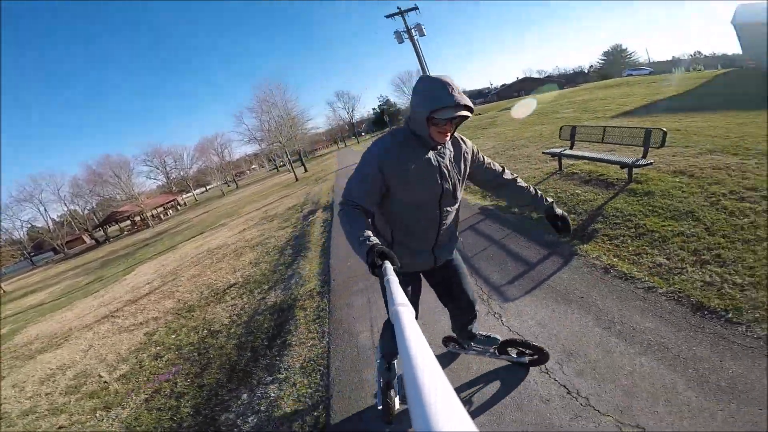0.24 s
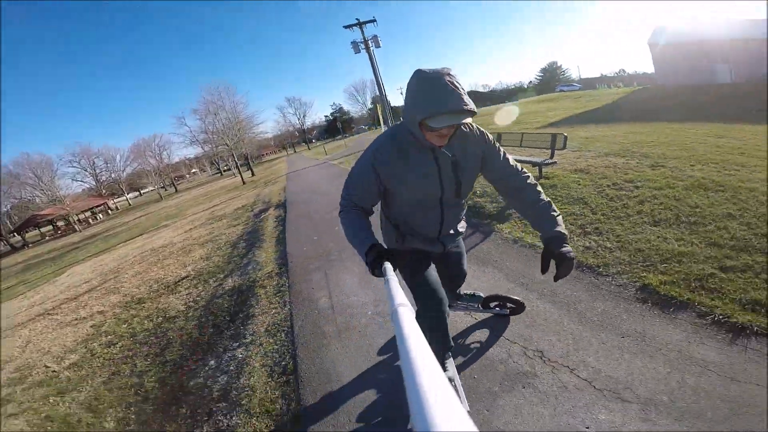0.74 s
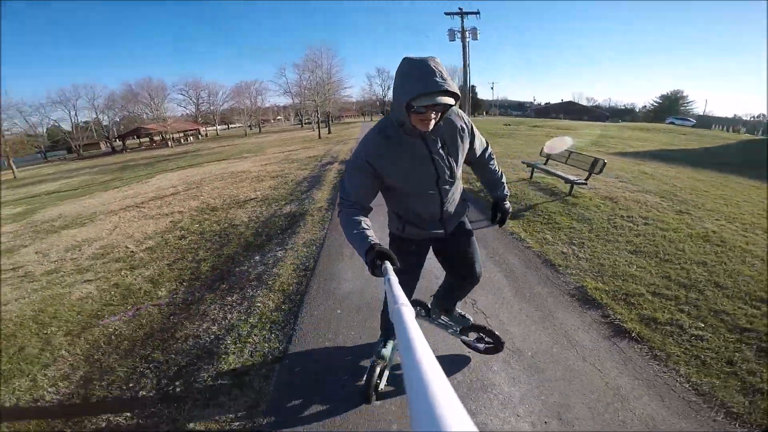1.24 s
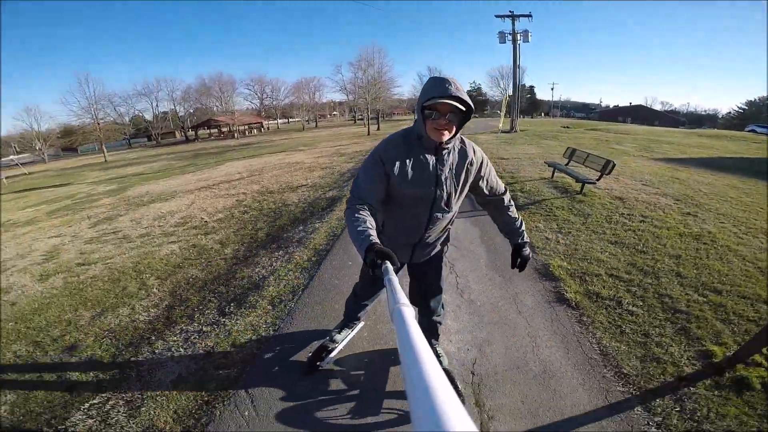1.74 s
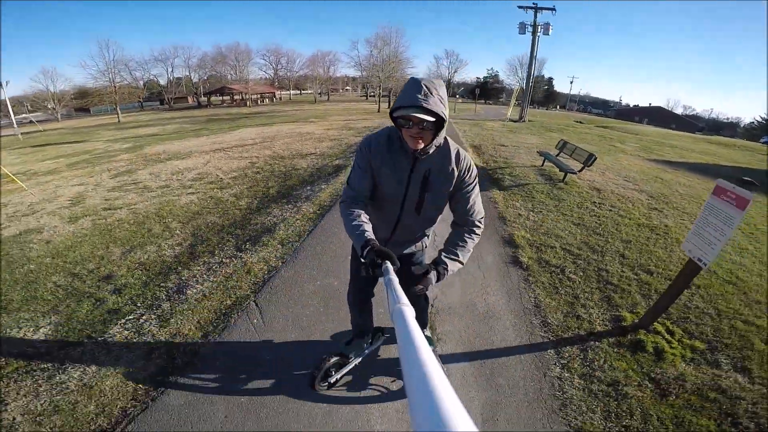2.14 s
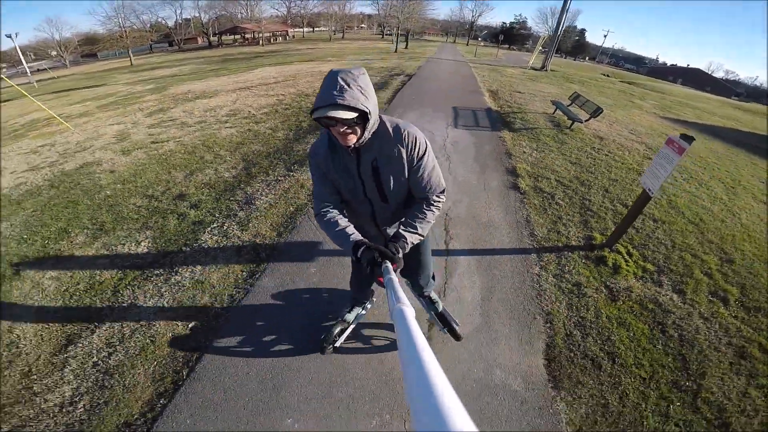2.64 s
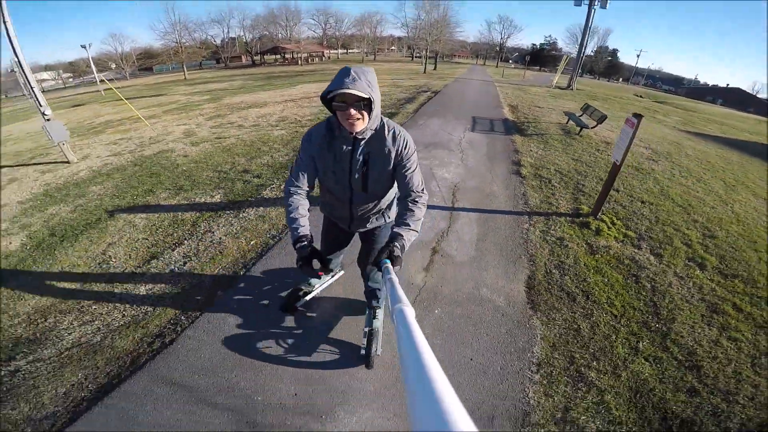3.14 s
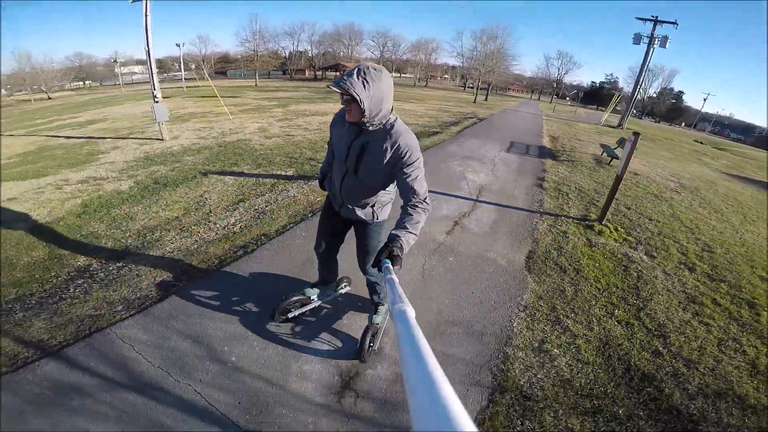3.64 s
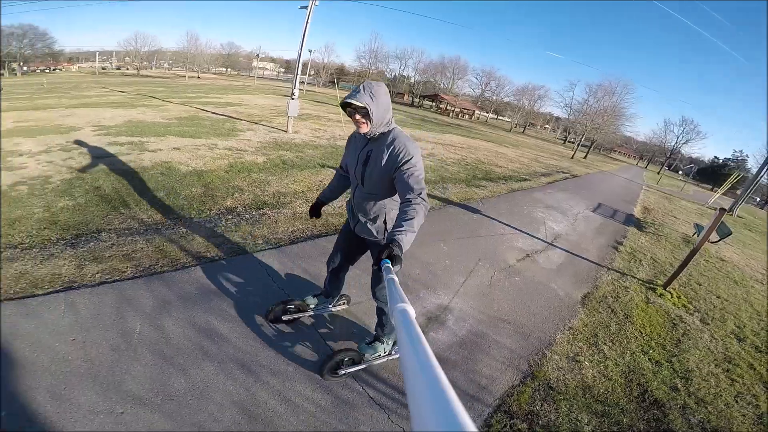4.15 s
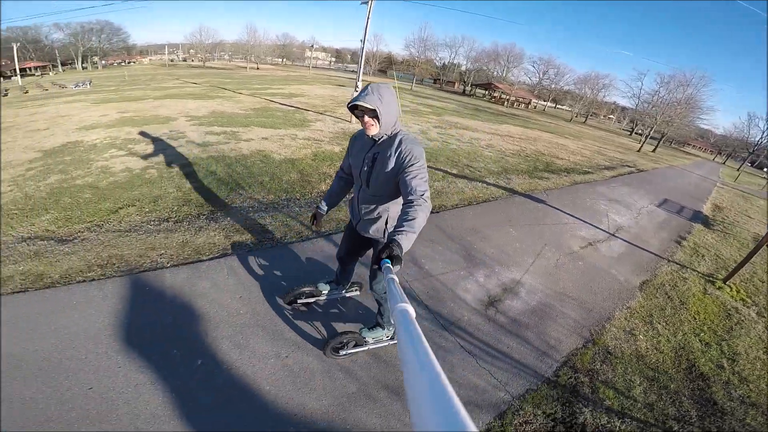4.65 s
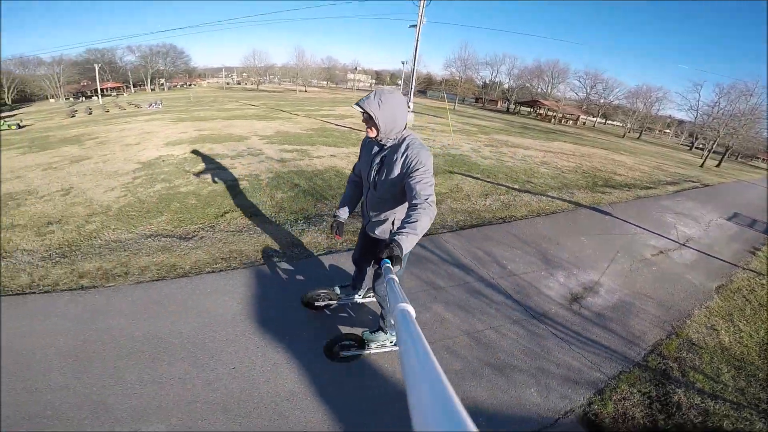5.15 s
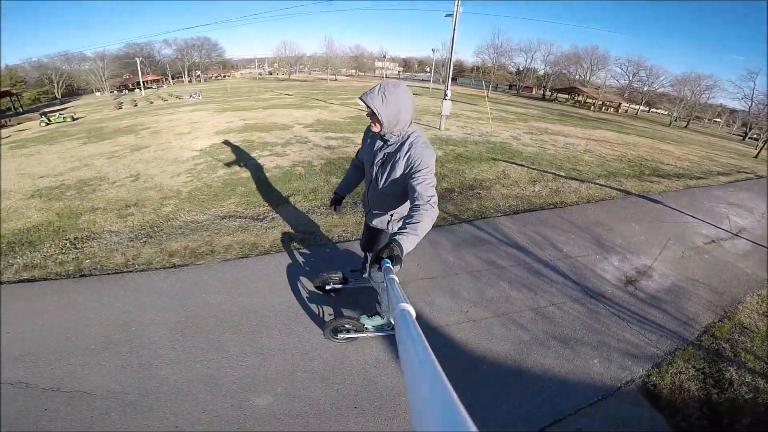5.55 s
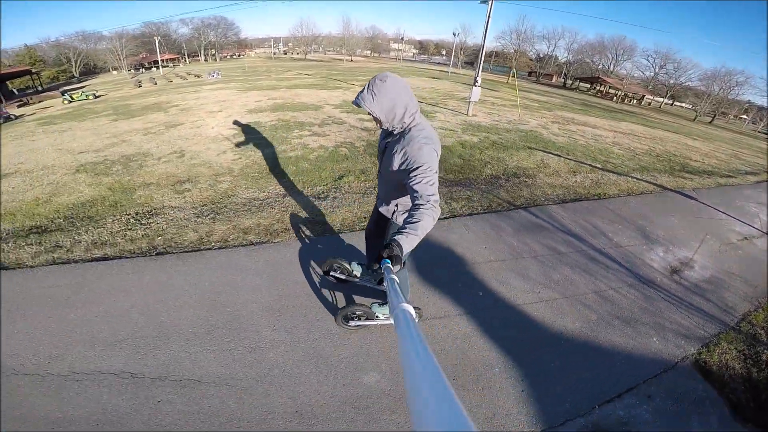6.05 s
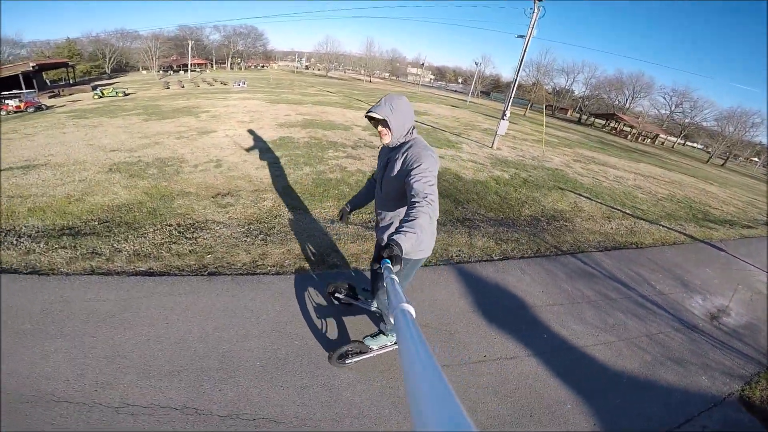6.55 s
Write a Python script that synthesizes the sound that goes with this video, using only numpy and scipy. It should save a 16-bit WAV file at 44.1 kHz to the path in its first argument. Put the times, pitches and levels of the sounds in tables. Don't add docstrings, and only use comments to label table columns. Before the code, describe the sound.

An open-air asphalt path, heard close and dry from a pole carried by a skater. Throughout, deep uneven rumble swells with arm movements and jolts, heavier on the right; thin wheel hiss and irregular grit ticks run above it. A far motor fades in the first 0.4 s. A ringing clack at 0.73 s brings a bright rattle and skid until about 0.9. Smaller clacks follow at 1.05 and 1.6. At 2.3 a strong metallic clack coincides with a rumbling jolt, glove rubbing and a cluster of snaps; brief rubs recur until 2.8. Bird chirps sound faintly near 3.0-3.2 and 3.8-4.3 while a distant engine rises from 3.05 to 4.4. The hardest clack hits at 3.82, with a short rattle. From 4.4 to 6 rolling is quieter, with sparse stones and wind buffets also on the left. A double clack at 6.15 trails a faint rattle, then rolling and rumble continue to 6.8.

```python
import sys
import numpy as np
from scipy import signal
from scipy.fft import rfft, irfft
from scipy.io import wavfile
from scipy.ndimage import uniform_filter1d

SR = 44100
rng = np.random.default_rng(int(sys.argv[2]) if len(sys.argv) > 2 else 0)


def file_out(sig):
    cols = np.atleast_2d(sig).T
    lim = np.clip(cols, -1, 1)
    pcm = np.round(lim * 32767).astype(np.int16)
    wavfile.write(sys.argv[1], SR, pcm)


def natural_amplitude(level_db):
    exponent = np.asarray(level_db, float) / 20
    return 10 ** exponent


N = 299880

# pitch_hz, width_hz, level_db
POLE_SWAY = [(44.6, 27, 42), (31.6, 18, -10), (65, 4.4, -29)]
# pitch_hz, width_hz, level_db
POLE_HIGH_MODE = [(114.1, 20.4, 13), (80, 15, 20), (155, 17, -39)]
# pitch_hz, width_hz, level_db
POLE_TUBE = [(202.4, 6.7, 10), (247.3, 8.3, -4.5), (398, 8.8, -6.5), (568, 44, -25.5)]
# start_s, length_s, level_db
ARM_SWINGS = [(0.05, 0.04, -24), (.25, .05, -19), (.46, 0.079, -17.5), (.62, 0.071, -10), (.98, 0.34, -16),
              (1.23, .08, -17), (1.52, .13, -11.5), (1.87, 0.13, -11.5), (2.33, 0.041, -15),
              (2.54, 0.04, -12.5), (2.77, 0.07, -13.5), (2.94, 0.098, -15.5), (3.2, 0.2, -15.5),
              (3.9, .12, -16.5), (4.13, 0.16, -12), (4.28, 0.36, -18.5), (4.57, 0.16, -16.5),
              (5.11, 0.15, -18.5), (5.46, 0.085, -21), (5.86, 0.11, -19.5), (6.15, 0.37, -17),
              (6.36, 0.16, -14.5), (6.78, 0.06, -19)]
# start_s, length_s, level_db
PATH_JOLTS = [(.12, 0.13, -18.5), (.54, 0.06, -13), (.74, 0.07, -12.5), (.99, 0.061, -12.5),
              (1.33, 0.11, -14), (1.72, 0.067, -15), (1.96, 0.18, -15.5), (2.2, 0.17, -16.5),
              (2.33, 0.039, -8.5), (2.54, 0.045, -16.5), (2.7, 0.08, -9.5), (3.05, 0.17, -18.5),
              (3.88, 0.095, -15.5), (4.06, 0.023, -20), (4.25, 0.68, -23), (4.62, 0.11, -22.5),
              (5.05, 0.1, -31), (5.52, 0.048, -28), (5.8, 0.18, -16.5), (6.22, 0.095, -16.5),]
# pitch_hz, level_db
WIND_FLUTTER = [(120, -23), (170, 2.5), (210, -3), (280, -9), (400, -21), (600, -32), (1000, -58),
                (2000, -56)]
# pitch_hz, width_hz, level_db
WIND_BUFFET = [(63, 9, 4), (85, 73, -4), (139, 36, -6)]
# start_s, length_s, right_db, left_db
WIND_GUSTS = [(.05, 0.034, -21, -29), (1.59, 0.071, -16, -28), (1.86, 0.038, -20, -45),
              (2.33, 0.11, -14, -28), (2.54, 0.024, -15, -52), (2.73, 0.017, -16, -46),
              (3.71, 0.093, -33, -45), (4.06, 0.03, -20.5, -78), (4.21, 0.087, -23, -42),
              (4.5, 0.083, -33, -40), (4.58, 0.093, -29, -22.5), (4.72, 0.21, -16.5, -18),
              (4.92, 0.12, -23, -40), (5.23, 0.093, -22, -26.5), (5.62, 0.44, -26, -33),
              (5.73, 0.095, -16, -21.5), (5.88, 0.23, -21.5, -32), (6.03, 0.54, -15, -23),
              (6.25, 0.062, -11.5, -23), (6.6, 0.15, -24, -55)]
# time_s, buffeting_db
LEFT_FACING = [(0, -28), (3.4, -37), (3.71, -21), (3.87, -27.5), (4.01, -21), (4.36, -31.5), (4.46, -15),
               (4.58, -32), (4.71, -15.5), (5.03, -20.5), (5.55, -21), (5.76, -19), (6.02, -30.5),
               (6.6, -28.5), (6.79, -30)]
SWAY_REST_DB, JOLT_REST_DB, FLUTTER_REST_DB, RUSTLE_REST_DB = -21, -27, -32, -36.5
JOLT_FLUTTER_DB = -10.5

# time_s, level_db
WHEEL_WEIGHT = [(0.0, -51), (0.45, -58.5), (0.83, -53), (1.27, -56), (1.72, -52.5), (2.31, -54),
                (2.73, -61.5), (3.11, -58.5), (3.81, -52.5), (3.98, -50.5), (4.45, -54), (5.79, -56.5),
                (6.19, -53), (6.53, -58.5), (6.8, -56)]
# pitch_hz, level_db (per Hz)
WHEEL_TONE = [(240, -52), (400, -3), (472, -9.5), (516, -5), (590, -12.5), (797, -10), (1330, -20),
              (1870, -24.5), (2050, -26), (2520, -27.5), (4950, -23.5), (6580, -30.5), (9400, -33.5),
              (14300, -43)]
ROAR_DB, ROAR_SHARE, ROAR_WIND = -50, 0.79, 0.093

# start_s, length_s, start_db, fade_db
MOTOR_PULLS = [
    (0, .38, -42, -2),
    (3.05, 1.39, -43, 8),
]
# time_s, shaft_hz
MOTOR_SHAFT = [(0, 44), (.45, 44.5), (3.0, 37.3), (4.5, 47.6)]
# multiple of shaft speed, level_db
MOTOR_ORDERS = [(6, 0), (9, -15), (10, -16), (11, -17)]

# start_s, peak_db, then knock_db, bright_db and ring_db above the peak
FRAME_CLACKS = [(0.1266, -23, -28, -0.5, -8), (0.7301, -17, -9.5, -0.5, 8), (0.7775, -37.5, 14, -19, -13),
                (0.819, -29.5, -26, 7, 0), (0.849, -40, -14, 13.5, 3), (1.045, -30, -11, -3.5, -20),
                (1.6035, -28.5, -4, -3, -18), (1.72, -33.5, -11, 2, 0.5), (2.2971, -12.5, -13.5, -2.5, 8.5),
                (2.325, -27, -11, -5, -17), (2.3528, -28.5, -10, 6, -4), (3.247, -28.5, -35, 1, -8),
                (3.8152, -10, -16.5, -4.5, -0.5), (3.8609, -33, 1, -12, -17), (3.8645, -30.5, -16, 5, -7),
                (3.889, -32, -25, 10.5, 5), (4.0464, -32.5, -5, -21, -7), (4.2225, -28, -1.5, -14, 1.5),
                (5.7645, -26.5, -15, -1.5, -25), (6.1472, -12.5, -14.5, -4.5, -8),
                (6.1553, -19, -23, -3.5, -0.5)]
# pitch_hz, level_db (per Hz)
FRAME_TONE = [(260, -32), (450, -24), (593, -9), (803, 8.5), (1090, -1.5), (1520, -6), (2180, -9),
              (2670, -3.5), (3040, -8), (4130, -6.5), (5510, -9), (6280, -11), (14300, -30.5)]
# pitch_hz, width_hz, level_db
FRAME_RING = [(2620, 45, 4.5), (2460, 200, -10), (2150, 115, -2), (1430, 310, -3), (3700, 340, -22),
              (5850, 240, 1), (1054, 107, 2.5), (6500, 320, -4), (9000, 330, 21.5), (12200, 850, 0)]
# pitch_hz, width_hz, level_db
BOOT_KNOCK = [(704, 160, 4.5), (890, 55, 9), (1410, 230, -17), (630, 100, 18.5)]
CLACK_T60_S = .046
# start_s, peak_db
STONE_SNAPS = [(0.5138, -37.5), (0.6847, -41), (0.917, -29.5), (1.459, -37), (1.75, -36), (1.7687, -38),
               (1.9546, -36), (1.9726, -36), (2.26, -30.5), (2.373, -26), (2.3894, -30), (2.418, -33),
               (2.4943, -28.5), (3.1348, -40), (3.3751, -30.5), (4.456, -36.5), (4.728, -37),
               (4.852, -35.5), (5.037, -30.5), (5.3261, -26.5), (5.5228, -37), (5.8431, -38), (6.02, -36),
               (6.0422, -35.5), (6.09, -37), (6.124, -38)]
# start_s, peak_db
STONE_TAPS = [(0.649, -36.5), (1.519, -36.5), (1.575, -34), (1.642, -33.5), (1.83, -38.5), (2.08, -35.5),
              (3.5003, -32), (3.642, -38), (3.713, -37), (3.788, -30), (3.9451, -30), (4.0256, -30.5),
              (4.146, -37.5), (4.396, -36.5), (4.419, -39), (4.6427, -39.5), (4.774, -35.5), (4.838, -27),
              (5.9752, -32), (6.218, -37), (6.47, -42.5)]
SNAP_BRIGHT_DB, TAP_BRIGHT_DB, STONE_T60_S, STONE_KNOCK_DB = 0, -18.5, 0.01, -20

# start_s, peak_db, pitch_hz
GRIT_CHIPS = [(0.4773, -37, 2560), (0.5374, -41, 2310), (0.7434, -27, 3720), (0.7856, -20, 6300),
              (0.7984, -27, 2730), (0.8104, -25, 6500), (0.8614, -31, 7500), (0.8724, -24, 6790),
              (0.9847, -43, 2350), (1.0894, -39, 2240), (1.1288, -43, 2200), (1.1697, -42, 2314),
              (1.2954, -36, 2260), (1.5444, -36, 2700), (1.6217, -25, 2370), (1.6671, -36, 2280),
              (1.7125, -28, 4080), (2.0408, -36.5, 2980), (2.154, -37, 3330), (2.1979, -34, 2650),
              (2.3634, -25, 2700), (2.3984, -35, 3310), (2.4084, -26, 6150), (2.4274, -31, 5200),
              (2.6813, -43, 2210), (3.1208, -37, 9370), (3.1544, -41, 2270), (3.1794, -50, 8850),
              (3.4615, -35, 2200), (3.475, -34, 2850), (3.835, -35, 2600), (3.8834, -27, 2740),
              (3.9064, -29, 4580), (3.9174, -43, 2400), (3.9719, -55, 2400), (4.0744, -49, 8990),
              (4.2424, -32, 2360), (4.2514, -36, 2620), (4.5346, -38, 2480), (4.5715, -36, 2720),
              (4.7132, -36, 2600), (4.7576, -34, 2600), (4.813, -32, 2600), (5.0918, -39, 3880),
              (5.1696, -38.5, 2320), (5.256, -37, 2460), (5.4036, -36.5, 2290), (5.4999, -36, 2450),
              (5.8514, -32, 2840), (5.8875, -39, 2420), (5.9914, -53, 2510), (6.1844, -38, 3680),
              (6.3744, -37, 2250)]
CHIP_DB, CHIP_RISE_S, CHIP_T60_S = -2, .0005, .016
CHIP_SHARPNESS, CHIP_HISS = 4, .7

# start_s, length_s, start_db, fade_db, bright_db (above)
SKIDS = [(.775, 0.13, -39.5, -14.5, -4), (1.49, 0.28, -58.5, 4, -4.5), (2.345, 0.1, -45, -9.5, 2.5),
         (3.115, 0.22, -51, -11, -7.5), (3.862, 0.068, -34.5, -6, -6), (.721, .01, -46, 6, 4),
         (.736, 0.027, -40, -2, -4), (3.822, 0.037, -40, -10, -3), (6.16, 0.048, -48, -8, -19),
         (4.21, 0.12, -36.5, -29, -13), (6.165, 0.36, -66, -3.5, 5)]
# pitch_hz, width_hz, level_db
BUCKLE_RING = [(6200, 550, 7), (4630, 540, -9), (7700, 450, -10), (9000, 310, 2.5)]

# start_s, length_s, start_db, fade_db
GLOVE_RUBS = [
    (1.5, 0.17, -51.5, -2.5),
    (2.2, 0.13, -48.5, 4),
    (2.3, 0.17, -37.5, -22.5),
    (2.5, 0.036, -49, -7),
    (2.6445, 0.019, -39, -7),
    (2.655, 0.12, -43.5, -19.5),
    (3.12, 0.071, -56.5, 10.5),
]
# pitch_hz, width_hz, level_db
CASE_CAVITY = [(1480, 380, 3), (2150, 500, -4), (3400, 900, -9)]
# pitch_hz, width_hz, level_db
CASE_FLEX = [(583, 140, 5.5), (910, 260, -1), (1330, 160, -3), (2000, 500, -7)]

# time_s, pitch_hz
BIRD_WHISTLES = [
    [(2.95, 5100), (2.97, 5450), (2.995, 5000)],
    [(3.04, 7800), (3.06, 9300), (3.1, 9550), (3.14, 9400), (3.19, 8900), (3.24, 8000)],
    [(3.785, 5400), (3.815, 5200)],
    [(3.92, 9200), (3.98, 9050), (4.016, 8645), (4.05, 8620), (4.07, 9000), (4.105, 8960), (4.13, 8550)],
    [(4.285, 9740), (4.325, 9720)],
]
BIRD_LEVELS = [-61, -58, -50, -57, -65]
BIRD_EASY_HZ, BIRD_DB_PER_KHZ, BIRD_SWELL_DB = 8700, -9, 4

# pitch_hz, likeness (0-1), right_lead_rad, left_minus_right_db
PORT_PAIR = [(300, .4, -3.1, -4), (650, .5, -2.7, -2), (1000, .55, -1.6, -2), (1900, .7, -.9, -1),
             (2600, .9, -.2, -1), (4500, .9, .1, -1), (6300, .85, .3, 3), (7400, .4, 1.1, 3),
             (8500, .6, 2.0, -5), (9600, .6, 2.0, -7), (11500, .5, .6, -2), (14000, .5, 0, -1)]


def evened(x):
    return x / np.sqrt(np.mean(x ** 2) + 1e-20)


def read(points, hz, axis=1):
    table = np.asarray(points, float)
    return np.interp(np.log(hz + 1), np.log(table[:, 0] + 1), table[:, axis])


def follow(rows):
    s, *columns = np.transpose(rows)
    return [np.interp(np.arange(N) / SR, s, c) for c in columns]


def resonate(x, modes):
    out = 0
    for hz, width, db in modes:
        pole = np.exp((2j * np.pi * hz - np.pi * width) / SR)
        out = out + natural_amplitude(db) * 2 * signal.lfilter([1 - abs(pole)], [1, -pole], x).real
    return out


def colour(x, points, lo_hz, hi_hz):
    hz = abs(np.fft.fftfreq(4096, 1 / SR)) + 1
    edges = 1 / (1 + (lo_hz / hz) ** 8) / (1 + (hz / hi_hz) ** 8)
    log_gain = np.log(natural_amplitude(read(points, hz)) * np.sqrt(edges) + 1e-6)
    taps = np.fft.ifft(np.exp(np.conj(signal.hilbert(log_gain)))).real[:2048]
    return signal.oaconvolve(x, taps[None] / np.linalg.norm(taps), axes=1)[:, :N]


def lumps(rate_hz, depth_db):
    steps = rng.standard_normal(N // 64 + 2)
    smooth = evened(signal.lfilter([1], [1, -np.exp(-2 * np.pi * rate_hz * 64 / SR)], steps))
    wander = np.interp(np.arange(N) / 64, np.arange(len(steps)), np.clip(smooth, -3, 2))
    return evened(natural_amplitude(depth_db * wander))


def humps(events, rest_db):
    s, length, *db = np.transpose(events)
    t = np.arange(0, N + 64, 64) / SR
    bells = np.exp(-2 * ((t - s[:, None]) / length[:, None]) ** 2)
    power = natural_amplitude(2 * np.array(db)) @ bells
    levels = [10 * np.log10(p + natural_amplitude(2 * r)) for p, r in zip(power, rest_db)]
    return [np.interp(np.arange(N) / SR, t, level) for level in levels]


def spans(events, rise, fall_s):
    out = np.zeros((len(events[0]) - 3, N))
    for s, length, db, fade_db, *above_db in events:
        t = np.arange(0, length, 1 / SR)
        ends = np.minimum(t / (rise * length), 1) * np.minimum((length - t) / fall_s, 1)
        shape = ends * natural_amplitude(db + fade_db * t / length)
        out[:, round(s * SR):][:, :len(t)] += natural_amplitude(np.array([0, *above_db]))[:, None] * shape
    return out


def bursts(events, t60):
    out = np.zeros((len(events[0]) - 1, N + 4000))
    t = np.arange(4000) / SR
    fall = natural_amplitude(-60 * t / t60) + 1.3 * np.exp(-t / 0.0018)
    shape = (1 - np.exp(-t / 0.00041)) * fall
    for s, db, knock_db, *above_db in events:
        gains = natural_amplitude(db - 6.5 + np.array([knock_db, 0, *above_db]))
        out[:, round(s * SR):][:, :len(t)] += gains[:, None] * shape
    return out[:, :N]


def strike(envelope, modes):
    blow = np.maximum(np.diff(envelope, prepend=0), 0)
    even_modes = [(hz, width, db - 20 * np.log10(width)) for hz, width, db in modes]
    return resonate(blow - np.roll(blow, 5), even_modes)


def three_bands(thud, middle, bright, points, top_hz):
    noise = rng.standard_normal((2, N))
    low_part = colour(noise * thud, points, 160, 1630)
    middle_part = colour(noise * middle, points, 1690, 5410)
    return low_part + middle_part + colour(noise * bright, points, 5056, top_hz)


def steadied(x, size):
    return evened(x / np.sqrt(uniform_filter1d(x ** 2, size=size) + 2.7 * np.mean(x ** 2)))


def shaken_modes(modes, broad_mode, size):
    noise = rng.standard_normal(N + 8000)
    return steadied(resonate(resonate(noise, modes), [broad_mode])[8000:], size)


def rumble():
    sway_db = humps(ARM_SWINGS, [SWAY_REST_DB])[0]
    high_db = humps(PATH_JOLTS, [JOLT_REST_DB])[0]
    gust_db, rustle_db = humps(WIND_GUSTS, [FLUTTER_REST_DB, RUSTLE_REST_DB])
    wind_db = follow(LEFT_FACING)[0]
    sway = shaken_modes(POLE_SWAY, (39.7, 14.7, 0), size=4000)
    high = shaken_modes(POLE_HIGH_MODE, (111.2, 40.5, 0), size=2000)
    wind = shaken_modes(WIND_BUFFET, (83, 71, 0), size=2500) * lumps(33, 0.52)
    tube = shaken_modes(POLE_TUBE, (296, 200, 0), size=1500)
    flutter = colour(rng.standard_normal((2, N)), WIND_FLUTTER, 81, 3000) * lumps(44.0, 3.75)
    calm = np.clip((-23 - wind_db) / 10, .05, 1)
    body = natural_amplitude(sway_db) * sway + natural_amplitude(high_db) * high
    shaken = np.hypot(natural_amplitude(gust_db), natural_amplitude(high_db + JOLT_FLUTTER_DB))
    near = natural_amplitude(-4.5) * shaken * (0.75 * calm * tube + np.sqrt(1 - 0.31 * calm) * flutter[1])
    late_copy = np.roll(natural_amplitude(-13) * body, 60) - natural_amplitude(-10.5) * near
    left_wind = natural_amplitude(wind_db + 1.5) * wind + natural_amplitude(rustle_db - 6.0) * flutter[0]
    return np.array([late_copy + left_wind, body + near])


def rolling():
    hiss_db, wind_db = follow(WHEEL_WEIGHT)[0], follow(LEFT_FACING)[0]
    weight_part = ROAR_SHARE * (hiss_db - hiss_db.mean())
    roar_db = ROAR_DB + weight_part + ROAR_WIND * (wind_db - wind_db.mean())
    hits = rng.random(N) < 70 / SR
    stones = hits * natural_amplitude(5.2 * np.minimum(rng.exponential(1, N), 4))
    grit = 0.63 * signal.lfilter([1], [1, -.985], stones)
    hiss = natural_amplitude(hiss_db) * lumps(60, 0.71)
    roar = natural_amplitude(roar_db) * lumps(6, 1.5)
    middle = natural_amplitude(-2.0) * hiss * (1 + grit)
    bright = natural_amplitude(-2.0) * hiss * (1 + 0.71 * grit)
    return three_bands(roar, middle, bright, WHEEL_TONE, top_hz=10200)


def motor():
    turns = 2 * np.pi * np.cumsum(follow(MOTOR_SHAFT)[0]) / SR
    hum = sum(natural_amplitude(order_db) * lumps(3.8, 4.2) * np.sin(k * turns) for k, order_db in MOTOR_ORDERS)
    return spans(MOTOR_PULLS, 0.16, 0.092) * hum * [[1], [.9]]


def clacks():
    knock, middle, bright, ring = bursts(FRAME_CLACKS, CLACK_T60_S)
    rings = natural_amplitude(73.5) * strike(ring, FRAME_RING) + natural_amplitude(74.0) * strike(knock, BOOT_KNOCK)
    snaps = [(s, db, STONE_KNOCK_DB, SNAP_BRIGHT_DB) for s, db in STONE_SNAPS]
    taps = [(s, db, STONE_KNOCK_DB, TAP_BRIGHT_DB) for s, db in STONE_TAPS]
    blows = [1.66 * knock, 0.48 * middle, 0.74 * bright] + bursts(snaps + taps, STONE_T60_S)
    return three_bands(*blows, FRAME_TONE, top_hz=11600) + rings * [[1], [.45]]


def chips():
    out = np.zeros((2, N + 2000))
    t = np.arange(2000) / SR
    shape = (1 - np.exp(-t / CHIP_RISE_S)) * natural_amplitude(CHIP_DB - 60 * t / CHIP_T60_S)
    for s, db, hz in GRIT_CHIPS:
        puff = resonate(rng.standard_normal((2, len(t))), [(5000, 3100, 0)])
        note = evened(resonate(puff, [(hz, hz / CHIP_SHARPNESS, 0)]))
        out[:, round(s * SR):][:, :len(t)] += natural_amplitude(db) * shape * (note + CHIP_HISS * puff) / 2
    return out[:, :N]


def drags():
    middle, bright = spans(SKIDS, 0.009, 0.021)
    clumps = lumps(45, 3.6)
    scrape = middle * clumps
    jingle = bright * clumps * lumps(90, 2.3)
    buckles = evened(resonate(rng.standard_normal((2, N)), BUCKLE_RING))
    skid = three_bands(natural_amplitude(-1.5) * scrape, scrape, natural_amplitude(-21.5) * jingle, FRAME_TONE, top_hz=9600)
    return skid + natural_amplitude(2.5) * jingle * buckles


def grip():
    slips = spans(GLOVE_RUBS, 0.096, 0.02)[0] * lumps(100, 3.5)
    noise = rng.standard_normal((2, N))
    alike = slips * evened(resonate(resonate(noise[0], CASE_CAVITY), [(1540, 760, 0)]))
    opposite = slips * evened(resonate(resonate(noise[1], CASE_FLEX), [(905, 650, 0)]))
    return natural_amplitude(4.5) * alike * [[.85], [1]] + natural_amplitude(11.0) * opposite * [[1], [-.9]]


def bird():
    out = np.zeros((2, N))
    for rows, db in zip(BIRD_WHISTLES, BIRD_LEVELS):
        a, b = round(rows[0][0] * SR), round(rows[-1][0] * SR)
        hz = uniform_filter1d(follow(rows)[0], size=300)
        strain_db = BIRD_DB_PER_KHZ * np.maximum(hz[a:b] - BIRD_EASY_HZ, 0) / 1000
        level_db = db + strain_db + np.linspace(-BIRD_SWELL_DB, 0, b - a)
        hz = hz * lumps(300, .13)
        tone = np.sin(2 * np.pi * np.cumsum(hz[a:b]) / SR) * signal.windows.tukey(b - a, .2)
        sides = [[-.55], [1.6]] if hz[a] > 7000 else [[.19], [.18]]
        out[:, a:b] += natural_amplitude(level_db + 17.5) * tone * sides
    return out * lumps(60, 4.5)


def ports(pair):
    hz = np.fft.rfftfreq(N, 1 / SR)
    same = np.clip(read(PORT_PAIR, hz), 0, 1)
    first, second = rfft(pair)
    turn = np.exp(1j * read(PORT_PAIR, hz, axis=2))
    right = same * first * turn + np.sqrt(1 - same ** 2) * second
    tilt = natural_amplitude(read(PORT_PAIR, hz, axis=3) / 2)
    return irfft(np.array([first * tilt, right / tilt]), N)


def scene():
    air = rolling() + clacks() + drags() + chips()
    return natural_amplitude(2.0) * ports(air) + rumble() + grip() + bird() + motor()


def top_cut(x):
    return signal.sosfilt(signal.butter(12, 15800, fs=SR, output="sos"), x)


def record(dry):
    dull = signal.sosfilt(signal.butter(10, 14000, fs=SR, output="sos"), dry)
    limited = .98 * np.tanh(dull / 1.04)
    return top_cut(limited)


dry = scene()
out = record(dry)
file_out(out)
```